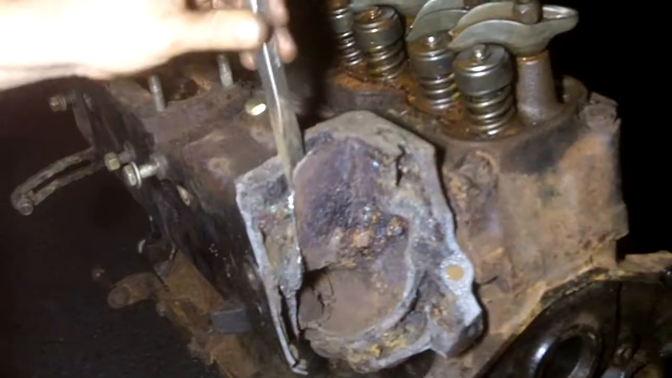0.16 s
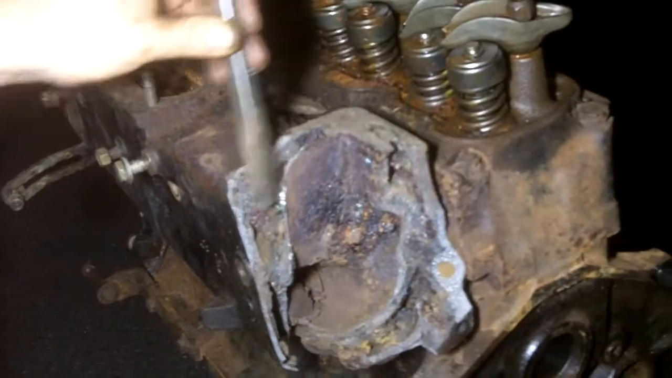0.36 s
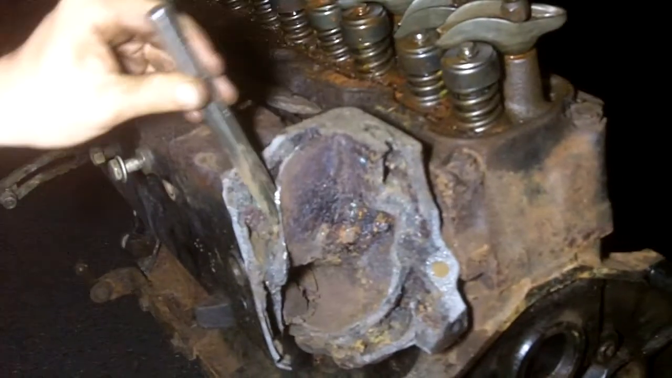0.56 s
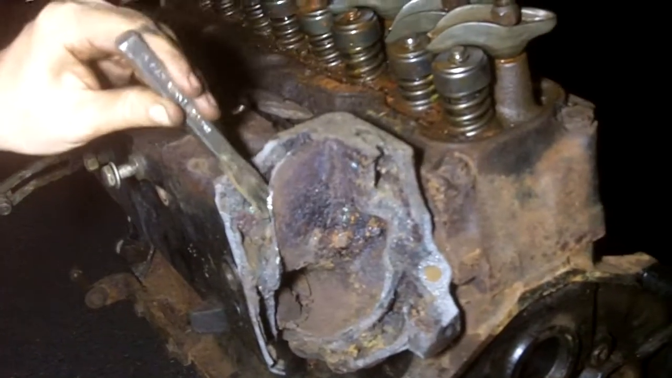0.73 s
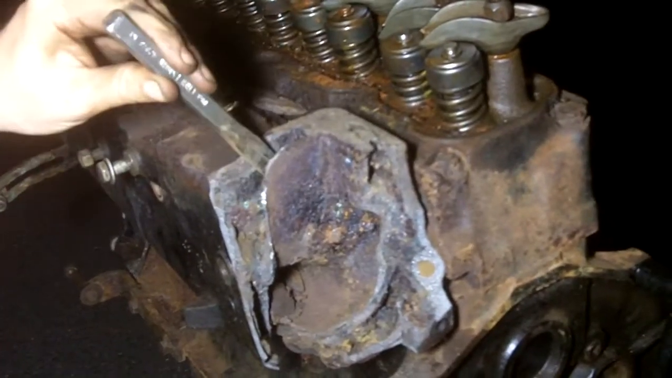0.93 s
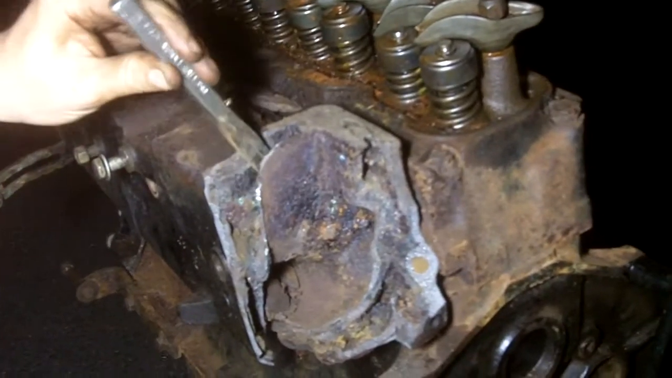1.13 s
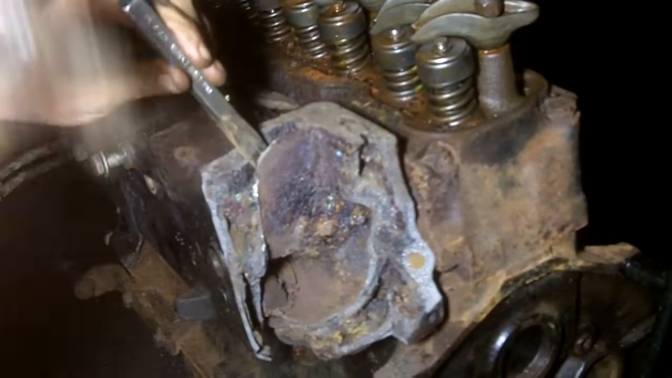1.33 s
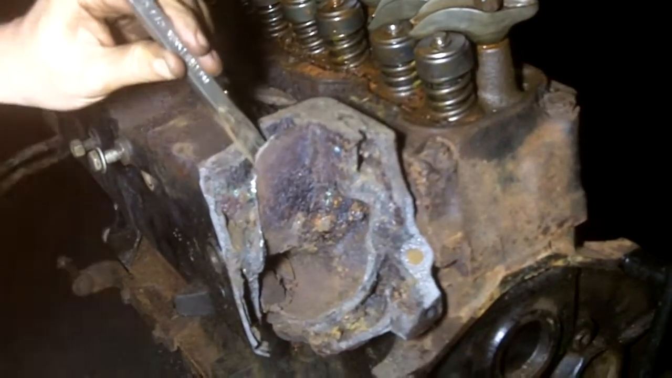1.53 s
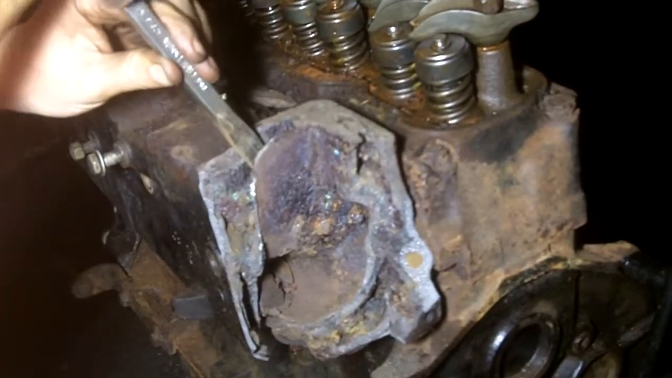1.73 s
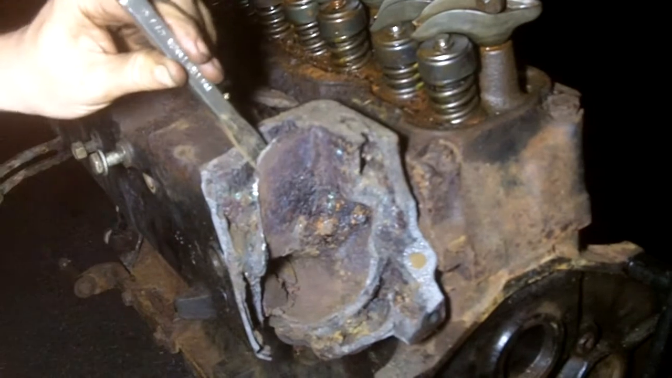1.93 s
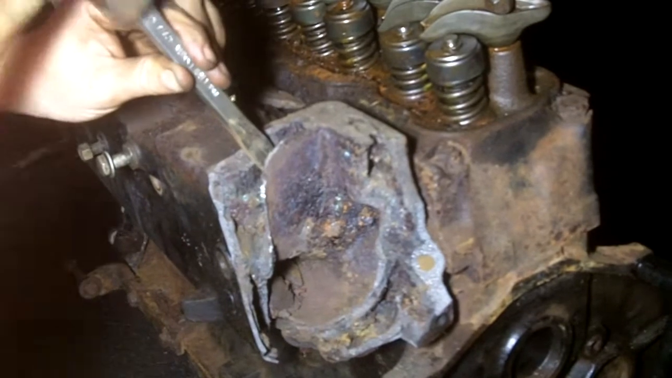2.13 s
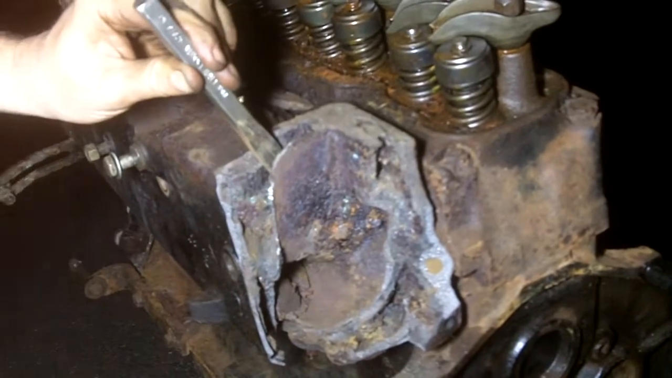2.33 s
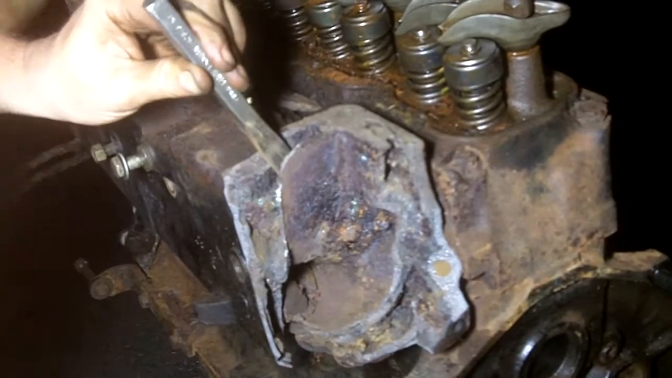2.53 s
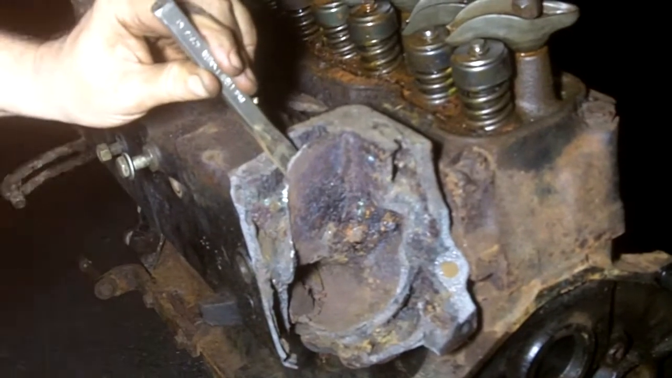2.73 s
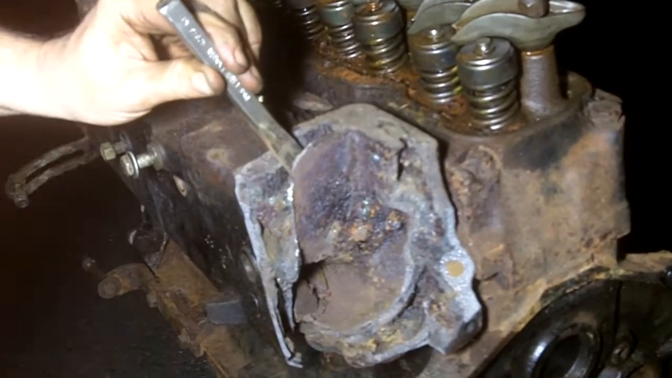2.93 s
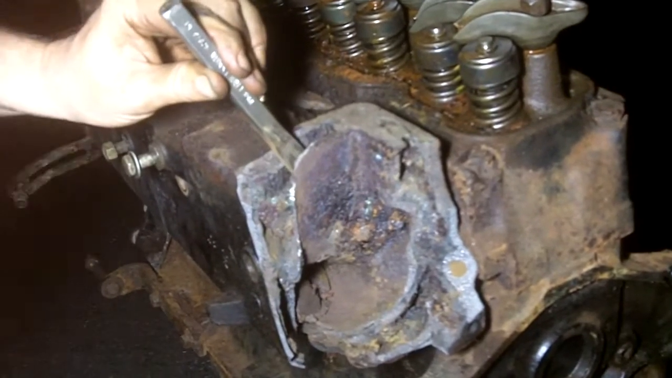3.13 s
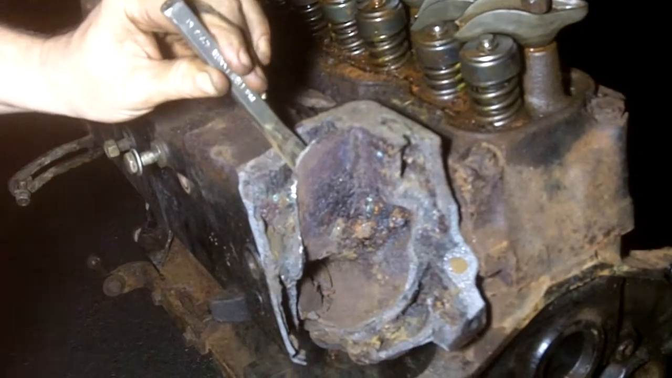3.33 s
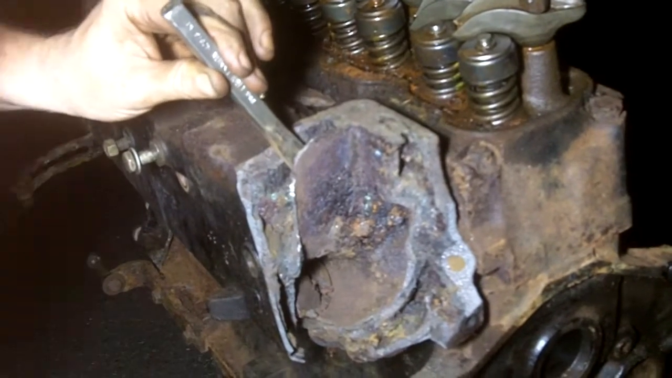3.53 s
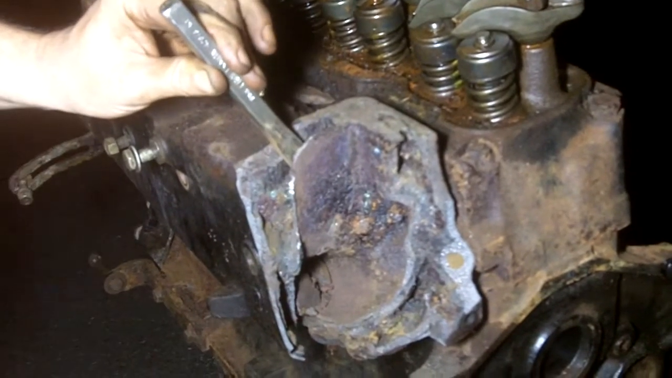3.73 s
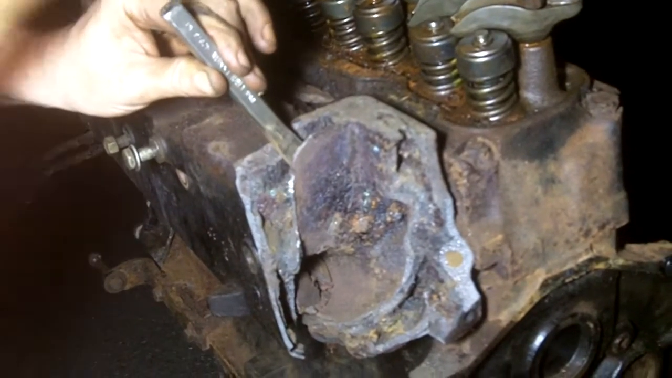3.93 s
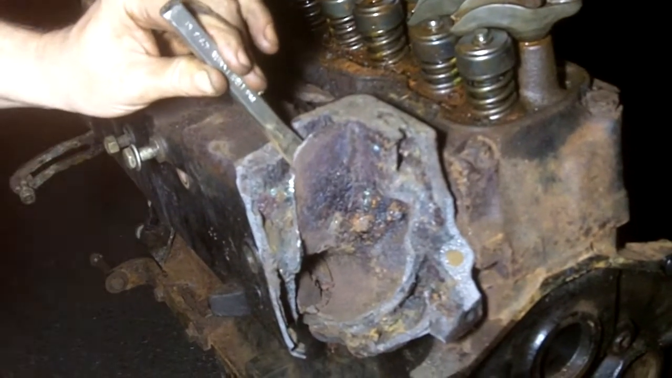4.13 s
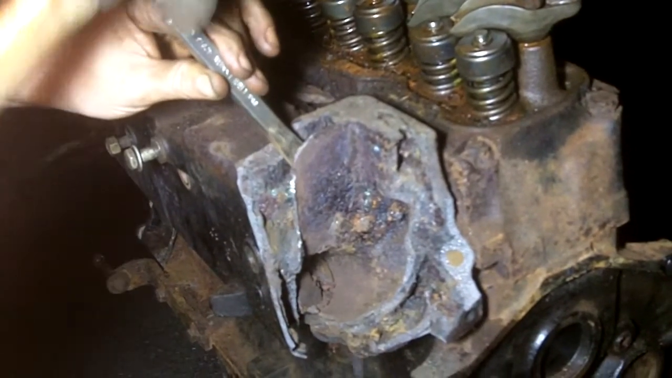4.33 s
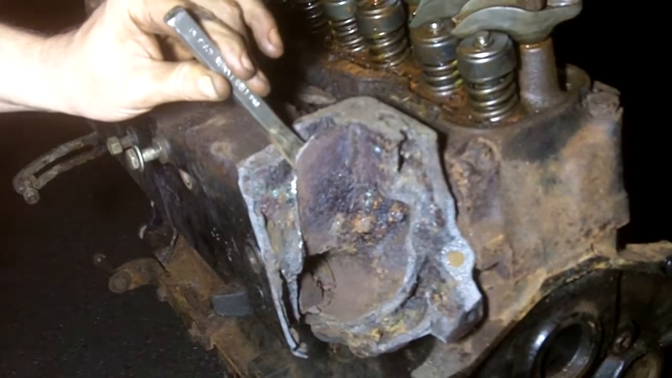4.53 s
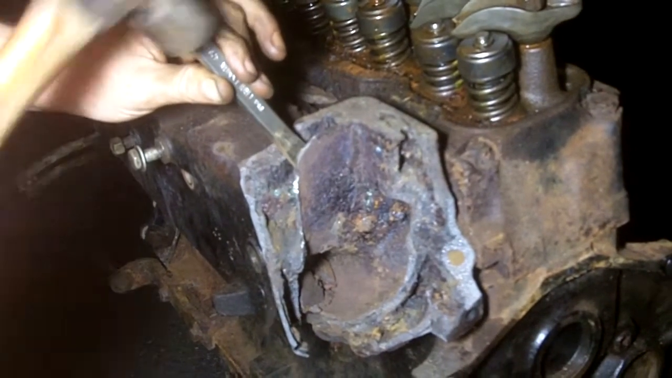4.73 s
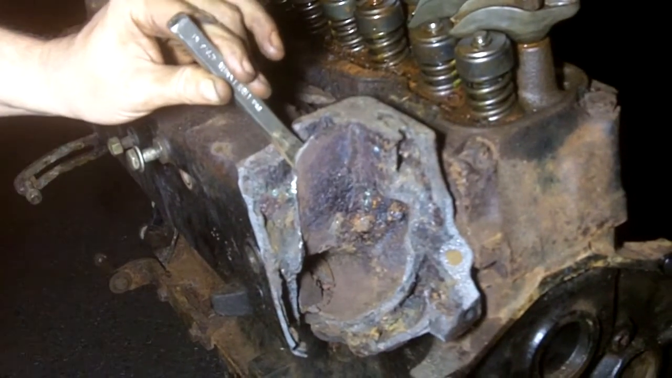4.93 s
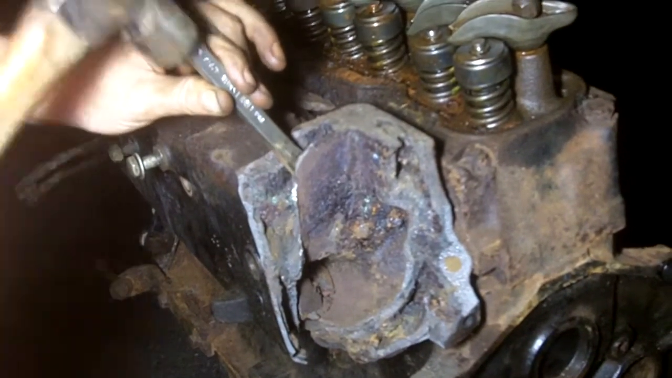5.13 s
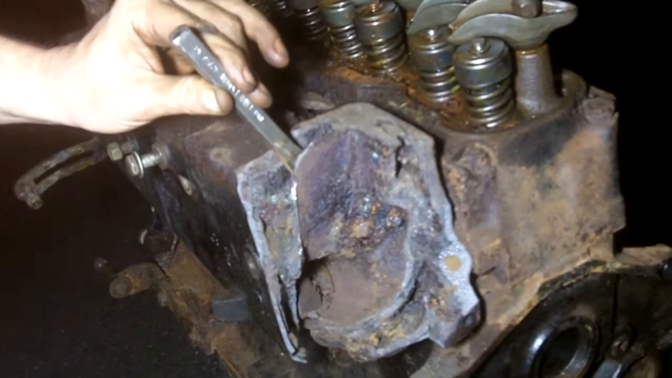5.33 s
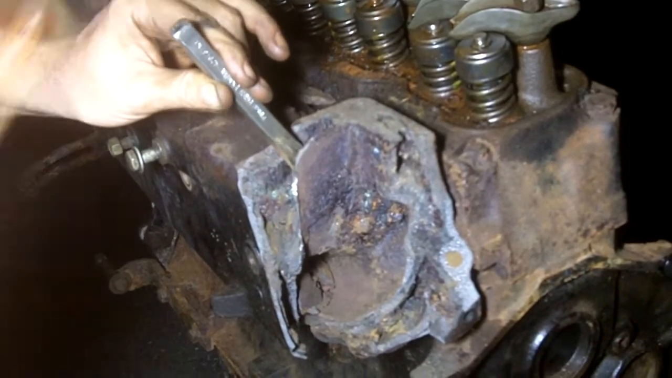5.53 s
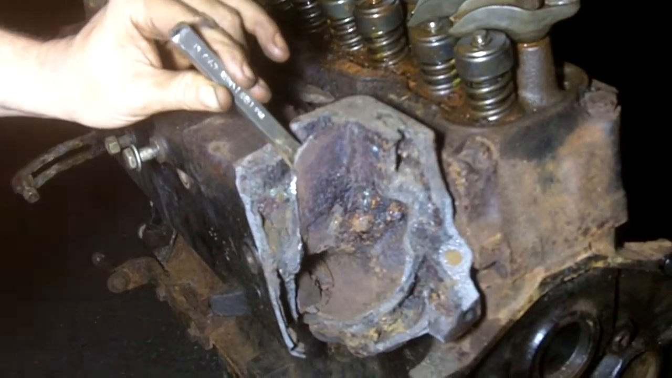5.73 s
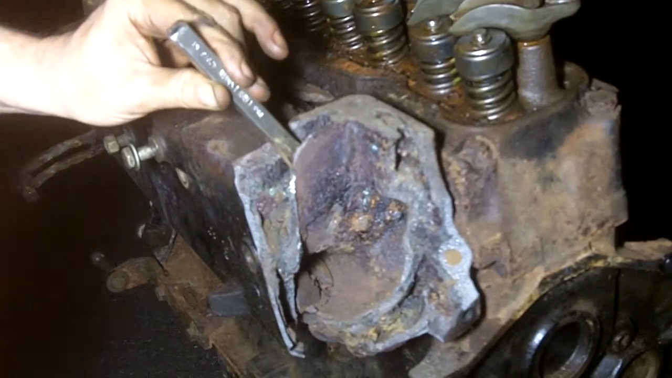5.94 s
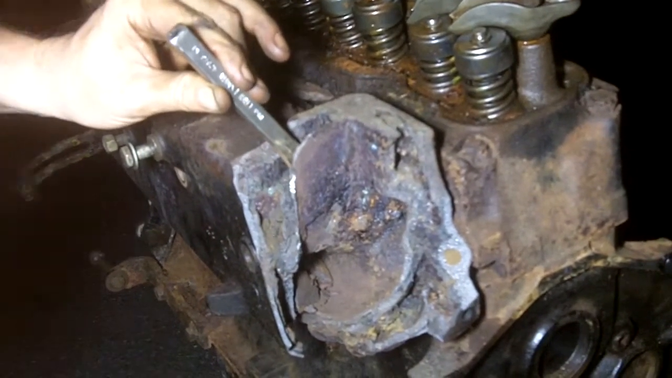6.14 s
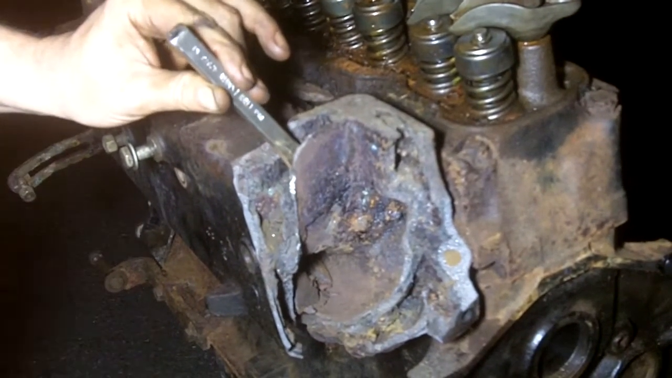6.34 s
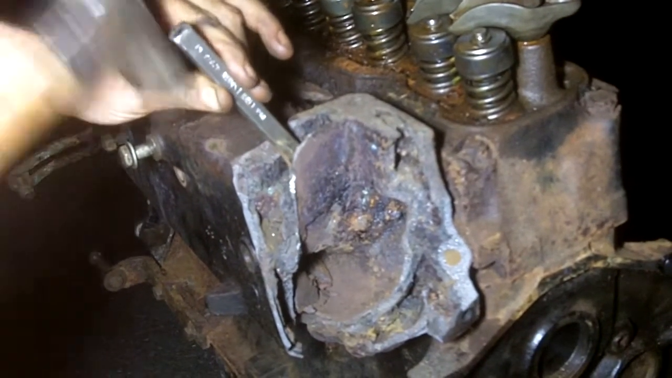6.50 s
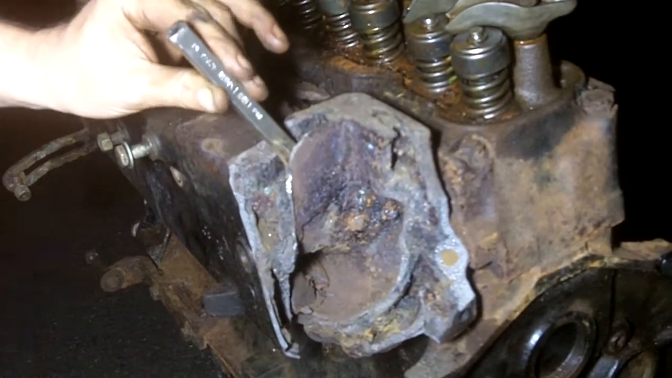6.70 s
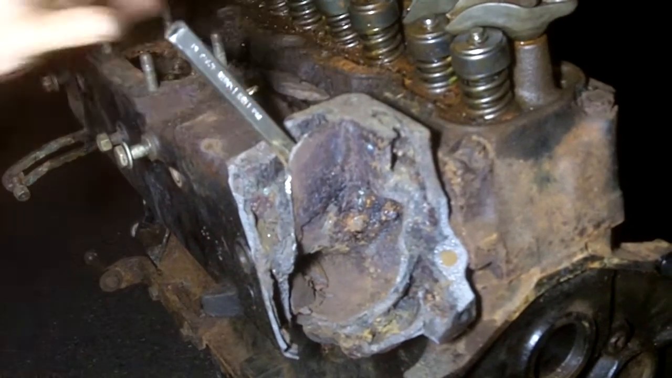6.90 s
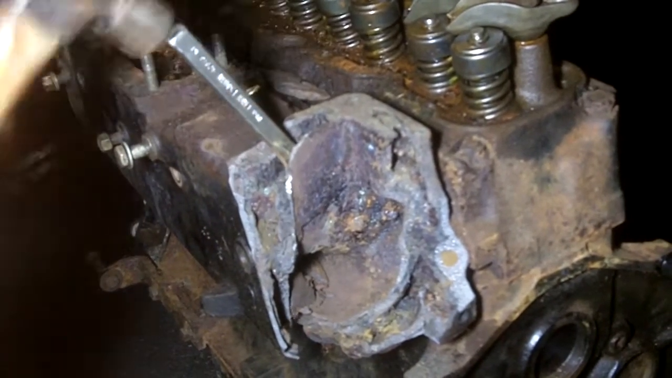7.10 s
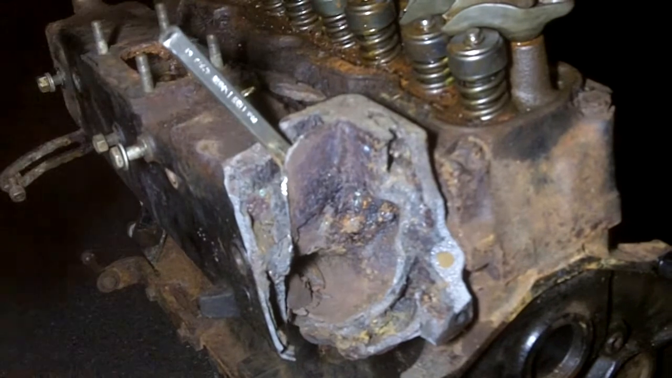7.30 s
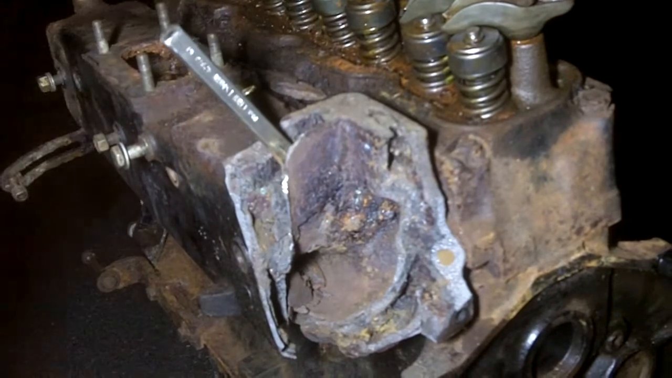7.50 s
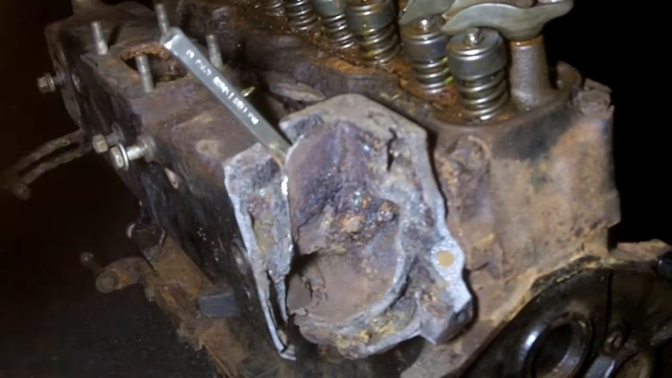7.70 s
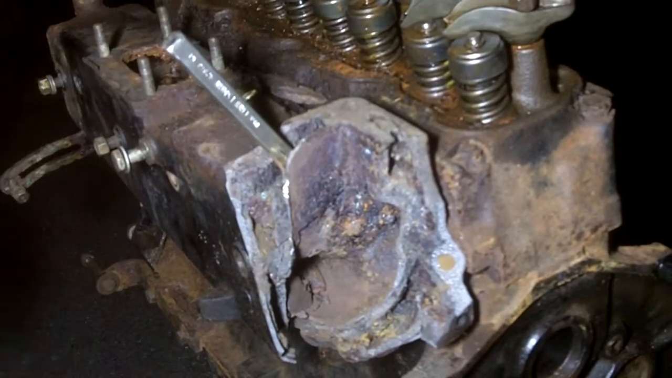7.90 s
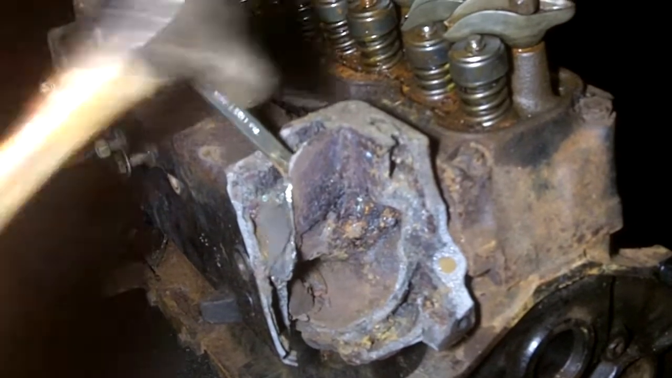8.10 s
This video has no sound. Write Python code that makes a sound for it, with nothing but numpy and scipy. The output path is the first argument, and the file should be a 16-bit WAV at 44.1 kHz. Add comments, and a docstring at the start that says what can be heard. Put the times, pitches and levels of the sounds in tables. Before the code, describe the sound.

A steel chisel taps, scrapes and briefly squeaks against a rusted cast-iron engine. Then a hammer hits it fifteen times, about two blows a second, each a short, hard crack with a little metallic ringing. The last three add a louder, lower clank as the chisel wedges in. The close microphone overloads slightly, with a small garage echo, soft clothing rustle and faint hiss.

```python
"""Fifteen hammer blows drive a steel chisel into a rusted cast-iron engine in a garage.
Each blow is a short, hard crack that overloads the close microphone; the room and the valve springs
ring on. As the chisel wedges in, the low clank of the loosening casting grows louder.
Before the blows the tip taps, scrapes and squeaks into place; between them it drops back with dull
ticks. Clothes rustle with the arm, over faint rumble and hiss."""
import sys
import numpy as np
from scipy import signal
from scipy.fft import rfft, irfft, next_fast_len
from scipy.io import wavfile

SR = 44100
rng = np.random.default_rng(int(sys.argv[2]) if len(sys.argv) > 2 else 0)


def to_wav(s):
    """Save 16-bit WAV."""
    ch = np.atleast_2d(s).T  # columns
    pcm = np.round(np.clip(ch, -1, 1) * 32767)  # PCM
    wavfile.write(sys.argv[1], SR, pcm.astype(np.int16))


N = 364266
T = np.arange(N) / SR
AGE = np.arange(SR) / SR  # seconds since an onset

# Each row: start in seconds; knock, clank, bite and sizzle in dB; chisel, edge and top ring in Hz;
# relative microphone push; sleeve swish in dB.
BLOWS = [ (1.7643, -42, -24, -12.5, -16, 3460, 7780, 10240, 0.0032, -46),
         (2.2160, -39.5, -27.5, -15, -18, 3210, 7780, 9820, 0.025, -60),
         (2.6511, -21, -31, -19, -19, 3340, 7040, 10500, 0.17, -46),
         (3.0798, -34.5, -31, -20, -19.5, 2626, 7220, 9460, 0.046, -58.5),
         (3.5000, -34.5, -35.5, -17.5, -19, 3366, 6630, 10000, 0.0087, -61),
         (3.9323, -29.5, -47, -20, -21.5, 3546, 6380, 10750, .016, -58.5),
         (4.3610, -39.5, -32, -18.5, -21, 3685, 8460, 10870, -0.012, -64),
         (4.7900, -29.5, -36.5, -16.5, -20, 3490, 7960, 10850, 0.0081, -47),
         (5.2192, -31, -31, -18, -18, 3530, 6790, 10840, 0.0093, -52),
         (5.6520, -29, -25.5, -18, -17, 3620, 6920, 12190, 0.03, -50.5),
         (6.0746, -28, -41.5, -17.5, -18, 2350, 6710, 11440, 0.058, -54.5),
         (6.5082, -35.5, -24.5, -19.5, -21, 4270, 7750, 10250, 0.0053, -47),
         (7.1612, -35, -17, -20, -17, 4350, 8130, 10030, 0.014, -46),
         (7.6666, -24.5, -13, -18.5, -17, 2230, 7430, 9680, 0.019, -40),
         (8.1490, -17.5, -21, -17.5, -17.5, 2480, 7020, 10500, 0.16, -45.5)]
# Echo spectra. Each row: frequency in Hz, level in dB.
WALL_SPECTRUM = [(100, -6.5), (400, -6), (900, 4.5), (1500, 2.5), (3300, -1.5), (4500, 3.5), (6500, 0),
                 (7700, 1), (9000, -4), (11500, -3), (14000, -20.5)]
GARAGE_SPECTRUM = [(100, -3.5), (400, -5.5), (900, 5), (1600, -1.5), (3200, -1.5), (4400, 1), (5000, 2.5),
                   (6500, 0), (7700, 5), (9000, -2.5), (11300, -2), (14000, -20)]
def hammering():
    """Each crack, the quick echo off near surfaces and the garage's longer one."""
    out = np.zeros(N)
    for s, *tone, _, _ in BLOWS:
        direct = crack(*tone)
        add(out, s, direct)
        add(out, s, amp(-25) * echo(direct, WALL_SPECTRUM, t60_s=0.054, rise_s=0.0013))
        room_db = -42.5 + 0.28 * coupling_db(s)
        add(out, s, amp(room_db) * echo(direct, GARAGE_SPECTRUM, t60_s=0.59, rise_s=0.005))
    return out


# Steel on steel. Each row: frequency in Hz, level in dB.
CRACK_SPECTRUM = [(60, 0.5), (300, 4), (600, -5), (1300, -2), (2000, 2.5), (3300, 3.5), (4200, -0.5),
                  (5000, 0.5), (6700, 2.5), (8200, 0.5), (10000, -6), (12500, -7), (15000, -9.5)]
def crack(knock_db, clank_db, bite_db, sizzle_db, chisel_hz, edge_hz, top_hz, size=4096):
    """Steel meets steel for about a millisecond; the gripped chisel rings only briefly."""
    def struck(hz, t60_s):
        return burst(1e-3 ** (AGE[:size] / t60_s) * np.sin(2 * np.pi * hz * AGE[:size]))

    contact = colour(puff(t60_s=0.0085, hold_s=0.0012, size=size), CRACK_SPECTRUM)
    low, middle, high = map(burst, registers(contact))
    ring_gain = gain_at([(2300, -6), (3000, -8), (3500, -6.5), (4500, -2)], chisel_hz)
    free_ring = amp(-11) * struck(hz=3484, t60_s=0.026)
    chisel = ring_gain * struck(chisel_hz, t60_s=0.013) + free_ring
    edge = burst(ring([(edge_hz, 0, 0.011), (top_hz, -5.5, 0.011)], 0, size))
    flange = burst(ring([(1080, 0.5, 0.016), (790, -4, 0.015)], 0.92, size))
    knock = burst(ring([(149.3, 1, 0.012), (283, -3, 0.018), (446.6, -1, 0.014)], 0.92, size))
    return (amp(knock_db + 2.5) * knock
            + amp(clank_db) * (amp(-6.5) * low + amp(-2.5) * flange)
            + amp(bite_db) * (amp(-2.5) * middle + chisel)
            + amp(sizzle_db) * (amp(-0.5) * high + amp(-3) * edge))


def echo(x, spectrum, t60_s, rise_s):
    """Diffuse sound gathers all directions, so only part keeps the direct sound's colour."""
    def tail():
        return colour(puff(t60_s) * (1 - np.exp(-AGE / rise_s)), spectrum)

    own = burst(signal.fftconvolve(x, tail())[:SR])
    diffuse = burst(colour(tail(), CRACK_SPECTRUM))
    return burst(band(own + 0.75 * diffuse, 12000, "lowpass"))


def microphone_pushes():
    """Each pressure step throws the microphone off its rest level, and it creeps back."""
    out = np.zeros(N)
    step = 1 - np.exp(-AGE / 0.00008)
    creep = np.exp(-AGE / 0.038)
    for s, *_, push, _ in BLOWS:
        add(out, s, 2.1 * push * step * creep)
    return out


# Valve springs, casting, hammer head and other steel. Each row: frequency in Hz, level in dB,
# t60 in seconds.
SPRING_MODES = [(362.5, 0.5, 3), (435, -6, 0.9)]
CASTING_MODES = [(647, -4, 0.58), (738, -5.5, 0.46), (890, -9.5, 0.45), (970, -9, 0.42), (1177, 2, 0.037),
                 (1180, -1.5, 0.059), (1490, -9.5, 0.08), (1605, -14.5, 0.48)]
STEEL_MODES = [(3000, -6, 0.35), (3470, -5, .3), (4210, -8, 1), (6800, -6, 1), (7200, -5, 0.92),
               (7600, -4, 0.42), (7760, -2, .4), (8100, -8.5, 0.41), (10500, -7.5, 0.2)]
# The rusted casting's close, damped modes. Each row: frequency in Hz, level in dB.
CLATTER_SPECTRUM = [(250, -19.5), (420, 1), (530, -5), (660, 2), (900, 3), (1100, -1), (1400, -9.5),
                    (2200, -15), (4000, -33.5), (9000, -46.5), (14000, -68)]
def engine():
    """Springs, casting and steel ring louder as the chisel wedges in; each blow restarts the springs."""
    out = np.zeros(N)
    starts_s = [row[0] for row in BLOWS]
    for s, gap_s in zip(starts_s, np.diff(starts_s + [N / SR + 1])):
        drive_db = coupling_db(s)
        until_next = np.clip((gap_s - AGE) / 0.0092, 0, 1)
        add(out, s, amp(-54.5 + 0.66 * drive_db) * ring(SPRING_MODES, scatter_db=0.56) * until_next)
        clatter = burst(colour(puff(t60_s=0.23), CLATTER_SPECTRUM))
        casting = burst(ring(CASTING_MODES, scatter_db=0.89))
        add(out, s, amp(-52.5 + drive_db) * (clatter + amp(-4.5) * casting))
        add(out, s, amp(-62.5 + 0.22 * drive_db) * ring(STEEL_MODES, scatter_db=2.3))
    return out


# Chisel-to-engine coupling. Each row: time in seconds, gain in dB.
COUPLING = [(1.76, 3.5), (3.3, -3), (4.7, 9.5), (5.7, 9.5), (7.16, 25.5), (8.15, 23.5)]
def coupling_db(s):
    """The deeper the chisel wedges in, the more of a blow reaches the engine."""
    return np.interp(s, *np.transpose(COUPLING))


# Each row: start in seconds, level in dB.
REBOUNDS = [(1.808, -55), (2.171, -53), (2.177, -52.5), (2.441, -56.5), (2.504, -57.5), (3.954, -38),
            (3.969, -52), (4.386, -39), (4.395, -46.5), (5.677, -38.5), (6.097, -35.5), (7.205, -35.5),
            (7.496, -53.5), (7.512, -57), (7.584, -63.5)]
# Each row: frequency in Hz, level in dB.
REBOUND_SPECTRUM = [(300, -13.5), (900, 6.5), (1500, -3.5), (2300, -1), (4500, -6.5), (8000, -12.5),
                    (13000, -35.5)]
def rebounds(size=4096):
    """The chisel jumps and drops back on the iron with a dull tick."""
    out = np.zeros(N)
    for s, db in REBOUNDS:
        rattle = puff(t60_s=0.08, size=size) * (1 - np.exp(-AGE[:size] / 0.001))
        add(out, s, amp(db) * burst(colour(rattle, REBOUND_SPECTRUM)))
    return out


# Each row: start in seconds, relative body and treble levels in dB.
TAPS = [(0.2243, -29, -71), (0.433, -34, -56), (0.5343, -35, -43.5), (0.5664, -30.5, -40.5),
        (0.6173, -24.5, -25), (0.8345, -20.5, -38), (0.9133, -36, -44), (0.9687, -29, -49),
        (0.9862, -19.5, -43), (0.9991, -19, -34), (1.1573, -37, -49), (1.2131, -34.5, -44.5),
        (1.5559, -44, -45.5), (1.6671, -46, -47.5), (2.5506, -33, -58.5), (2.582, -40, -63.5),
        (6.6273, -31, -49), (7.091, -37, -77)]
# The loosely held chisel. Each row: frequency in Hz, level in dB, t60 in seconds.
CHISEL_MODES = [(1073, -4, 0.04), (1806, -9, 0.095), (2890, 0.5, 0.037), (3460, 1, 0.01), (4480, 2, 0.019),
                (6220, -6, 0.028), (6680, -9, 0.073), (7560, -4, 0.06), (11500, -12.5, 0.064)]
def taps():
    """The tip touches the iron: a tick, the chisel's free ring and a little room."""
    out = np.zeros(N)
    for s, body_db, treble_db in TAPS:
        tick = burst(colour(puff(t60_s=0.041), CRACK_SPECTRUM))
        tick += amp(-3.5) * burst(ring(CHISEL_MODES, scatter_db=2))
        room = amp(-14) * echo(tick, GARAGE_SPECTRUM, t60_s=0.34, rise_s=0.006)
        low, middle, high = map(burst, registers(tick + room))
        add(out, s, amp(body_db - 15) * (middle + amp(-4) * low) + amp(treble_db - 6.5) * high)
    return out


# Each row: start in seconds, length in seconds, relative level in dB.
STROKES = [(0.195, 0.061, -43), (0.39, 0.017, -50), (0.517, 0.065, -46), (0.583, 0.1, -42),
           (0.811, 0.02, -36.5), (0.903, 0.061, -36.5), (1.093, 0.018, -47), (1.363, 0.054, -55.5),
           (1.49, 0.063, -55.5)]
# Each row: frequency in Hz, level in dB.
GRIT_SPECTRUM = [(300, -23), (700, 10), (1080, 7.5), (1500, -2.5), (2800, -2), (3600, 7), (5000, -7),
                 (6500, 3.5), (8000, -11), (9500, -17), (11300, -10), (14500, -25)]
def scraping(grains_per_s=510, attack_s=0.015, release_db_per_s=218.5):
    """The tip catches on grains of rust, which tick and set the chisel ringing."""
    catches = (rng.random(N) < grains_per_s / SR) * rng.uniform(-1, 1, N)
    catches += 0.015 * rng.standard_normal(N)
    grit = unit(colour(catches, GRIT_SPECTRUM))
    chisel = unit(signal.fftconvolve(catches, ring(CHISEL_MODES, scatter_db=0.84))[:N])
    pressure = np.zeros(N)
    attack = np.minimum(AGE / attack_s, 1)
    for s, length_s, db in STROKES:
        release = amp(-release_db_per_s * np.maximum(AGE - length_s, 0))
        add(pressure, s, amp(db - 8.5) * attack * release)
    return pressure * (grit + amp(-3) * chisel)


# Each row: start in seconds, length in seconds, pitch in Hz, level in dB.
SQUEAKS = [(0.529, 0.025, 2720, -36), (0.558, 0.029, 2680, -46.5), (0.976, 0.021, 2690, -34.5),
           (.998, 0.0036, 3520, -20.5)]
def squeaks(attack_s=0.004, t60_s=0.023):
    """The tip sticks and slips, and the chisel sings."""
    out = np.zeros(N)
    for s, length_s, hz, db in SQUEAKS:
        envelope = np.minimum(AGE / attack_s, 1) * 1e-3 ** (np.maximum(AGE - length_s, 0) / t60_s)
        waver_rad = 0.7 * unit(band(rng.standard_normal(SR), 120, "lowpass"))
        add(out, s, amp(db) * envelope * np.sin(2 * np.pi * hz * AGE + waver_rad))
    return out


# Each row: centre in seconds, half length in seconds, relative level in dB.
ARM_SHIFTS = [(0.194, 0.18, -41), (0.624, 0.34, -45), (1.456, .23, -35), (2.052, 0.17, -46.5),
              (6.981, 0.24, -48.5)]
# Shared by arm and background. Each row: frequency in Hz, level in dB.
RUSTLE_SPECTRUM = [(88, -37), (150, -8), (177, -7), (210, -12), (294, -12.5), (364, 1), (444, -16.5),
                   (749, -24.5), (814, -31.5), (1400, -49), (1820, -75.5), (3080, -120)]
RUMBLE_SPECTRUM = [(12, -30), (20, -4.5), (27, 1.5), (86, -12), (146, -9.5), (210, -20.5), (260, -15),
                   (340, -41.5), (570, -120)]
def arm(lead_s=0.035, rise_db_per_s=76, fall_db_per_s=224.5):
    """Clothes rustle and rumble: a swell for each change of grip, a swish just before each blow."""
    motion = sum(amp(db) * np.exp(-((T - s) / half_s) ** 2) for s, half_s, db in ARM_SHIFTS)
    for s, *_, swish_db in BLOWS:
        ahead_s = s - lead_s - T
        motion += amp(swish_db - np.maximum(rise_db_per_s * ahead_s, -fall_db_per_s * ahead_s))
    return amp(-3) * motion * (noise(RUSTLE_SPECTRUM) + amp(-15) * noise(RUMBLE_SPECTRUM))


# Each row: time in seconds, relative level in dB.
BACKGROUND_LEVELS = [(.16, 0.5), (1.75, -1.5), (1.8, -10), (2.7, -14), (4.3, -13.5), (8.26, -11)]
# Each row: frequency in Hz, level in dB.
HISS_SPECTRUM = [(500, 14.5), (1000, 8.5), (2000, 2), (3400, -4), (4500, 9), (5200, -12.5), (7000, -8),
                 (10000, -12.5), (14000, -14), (15500, -32.5)]
def background():
    """Rumble, dull room noise and hiss drop at the first blow and stay low; the rumble drops most."""
    level_db = np.interp(T, *np.transpose(BACKGROUND_LEVELS))
    rumble = amp(-42.5 + 1.3 * level_db) * noise(RUMBLE_SPECTRUM)
    room = amp(-53 + level_db) * noise(RUSTLE_SPECTRUM)
    hiss = amp(-57.5 + level_db) * noise(HISS_SPECTRUM)
    return rumble + room + hiss


def amp(db):
    """Decibels to gain."""
    return 10 ** (np.asarray(db) / 20)


def unit(x):
    """Scale to rms 1."""
    return x / np.sqrt(np.mean(x ** 2) + 1e-20)


def burst(x):
    """Scale to the energy of 10 ms at rms 1."""
    return x / np.sqrt(np.sum(x ** 2) / (SR / 100) + 1e-20)


def gain_at(spectrum, hz):
    """Gain between (Hz, dB) points on a log axis."""
    points_hz, db = np.transpose(spectrum)
    return amp(np.interp(np.log(hz + 1), np.log(points_hz + 1), db))


def colour(x, spectrum):
    """Minimum-phase filter through (Hz, dB) points."""
    size = 2 * next_fast_len(len(x) // 2 + 1024)
    cepstrum = irfft(np.log(gain_at(spectrum, np.fft.rfftfreq(size, 1 / SR)) + 1e-6))
    cepstrum[1:size // 2] *= 2
    cepstrum[size // 2 + 1:] = 0
    return irfft(rfft(x, size) * np.exp(rfft(cepstrum)))[:len(x)]


def band(x, hz, kind, order=4):
    """Causal pass filter."""
    return signal.sosfilt(signal.butter(order, hz, kind, fs=SR, output="sos"), x)


def registers(x):
    """Low, middle and high bands."""
    return band(x, [550, 1400], "bandpass"), band(x, [1400, 5400], "bandpass"), band(x, 5600, "highpass")


def noise(spectrum):
    """Steady coloured noise, rms 1."""
    return unit(colour(rng.standard_normal(N), spectrum))


def puff(t60_s, hold_s=0, size=SR):
    """Noise that holds, then decays."""
    return rng.standard_normal(size) * 1e-3 ** (np.maximum(AGE[:size] - hold_s, 0) / t60_s)


def ring(modes, scatter_db, size=SR):
    """Decaying (Hz, dB, t60 s) modes with random strength and phase."""
    t = AGE[:size]
    return sum(amp(db + scatter_db * rng.normal()) * 1e-3 ** (t / t60_s)
               * np.sin(2 * np.pi * (hz * t + rng.random())) for hz, db, t60_s in modes)


def add(track, s, x):
    """Mix x into the track at s seconds."""
    i = round(s * SR)
    track[i:i + len(x)] += x[:N - i]


def scene():
    """All sources at one microphone; light contacts last longer than blows and lack the top treble."""
    blows = hammering() + engine() + microphone_pushes()
    light_contacts = band(rebounds() + taps() + scraping() + squeaks(), 11500, "lowpass")
    mono = blows + light_contacts + arm() + background()
    return np.array([mono, mono])


def record(dry, notch_hz=5450, offset=0.015, start_s=0.155, top_hz=15700):
    """Microphone: port notch, small offset, silent start, overload at full scale and band limit."""
    x = signal.lfilter(*signal.iirnotch(notch_hz, Q=6, fs=SR), dry)
    x = (x + offset) * (T > start_s)
    overloaded = x / (1 + np.abs(x) ** 6) ** (1 / 6)
    return band(overloaded, top_hz, "lowpass", order=18)


dry = scene()
out = record(dry)
to_wav(out)
```